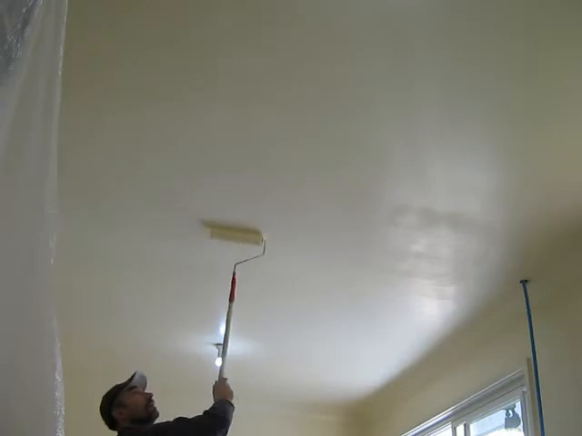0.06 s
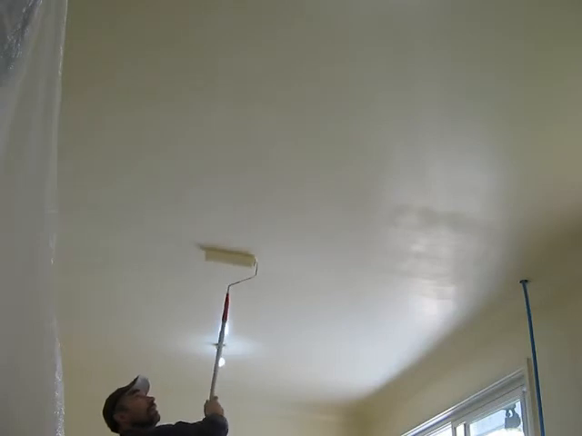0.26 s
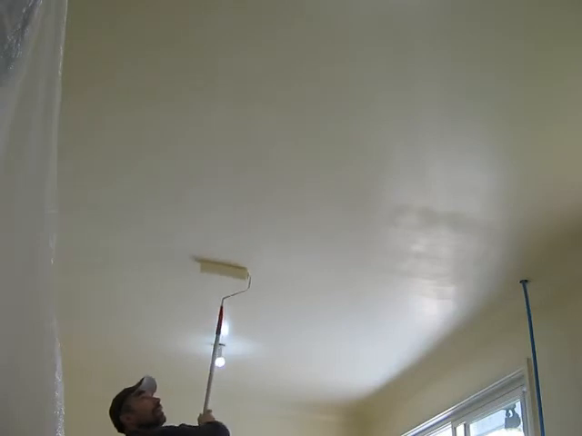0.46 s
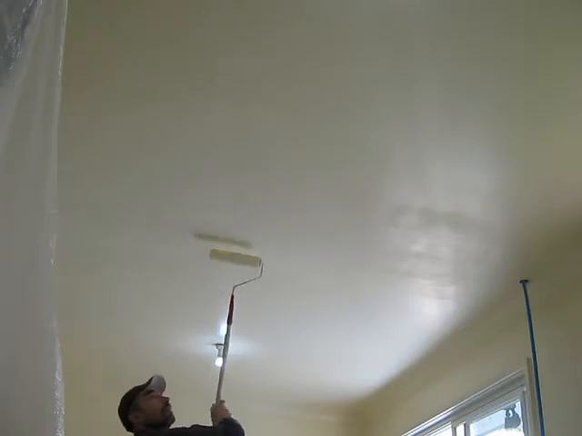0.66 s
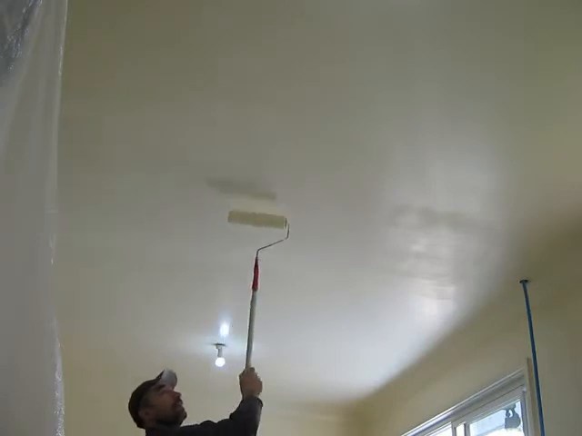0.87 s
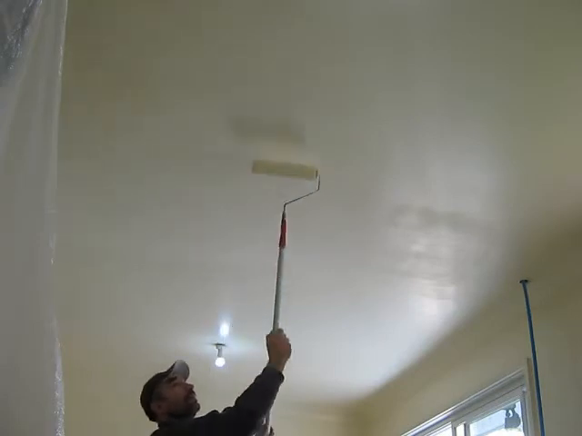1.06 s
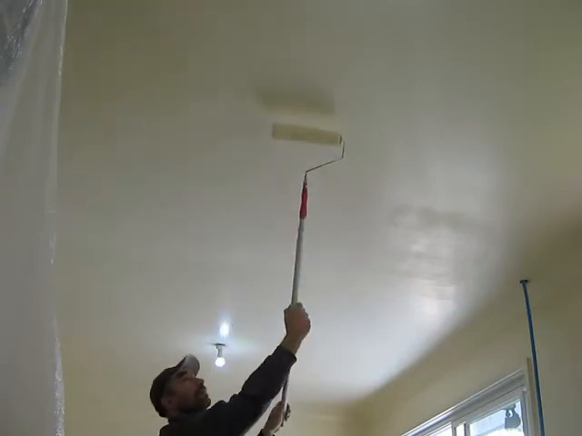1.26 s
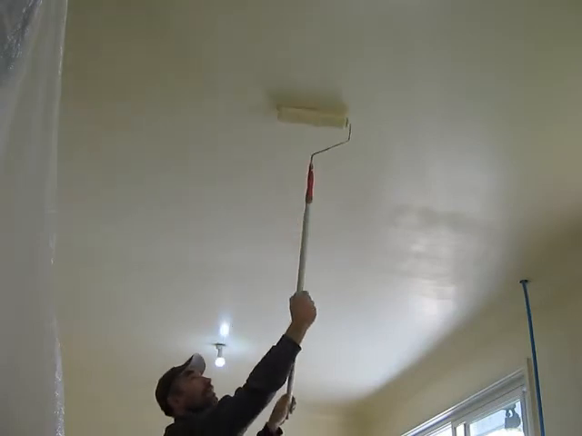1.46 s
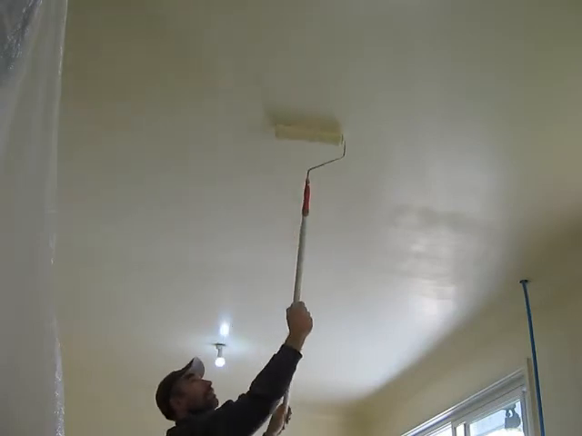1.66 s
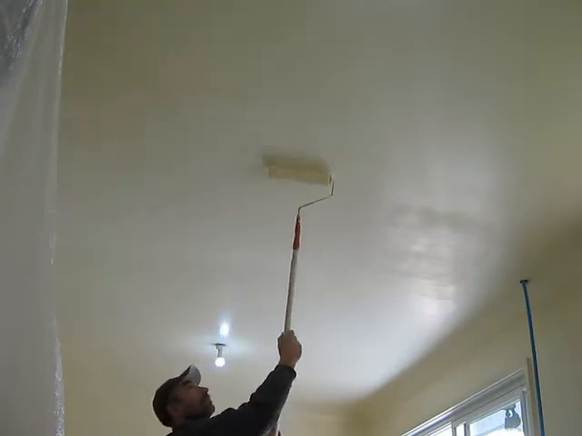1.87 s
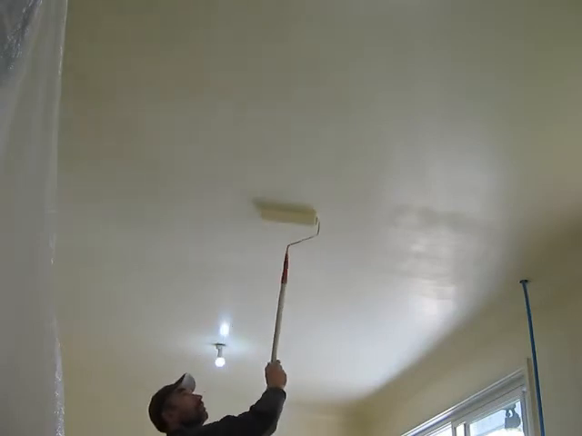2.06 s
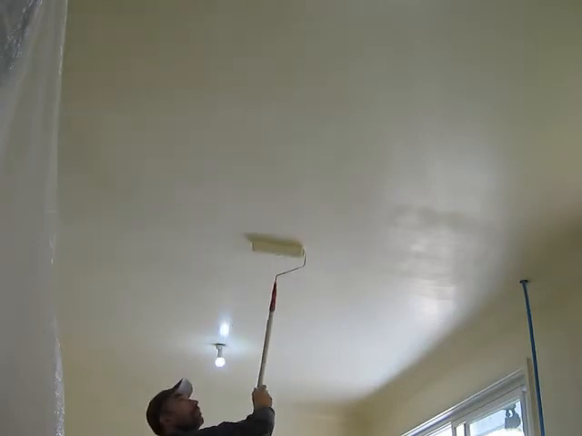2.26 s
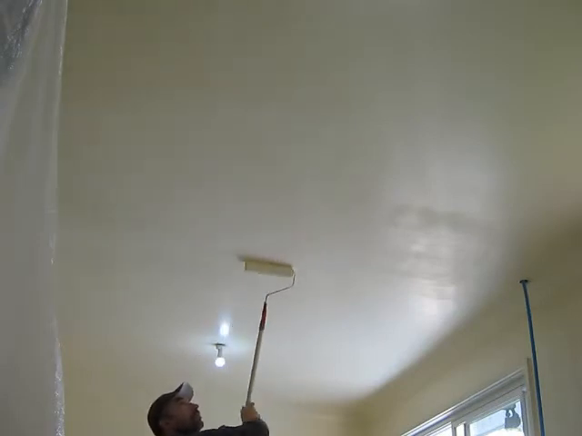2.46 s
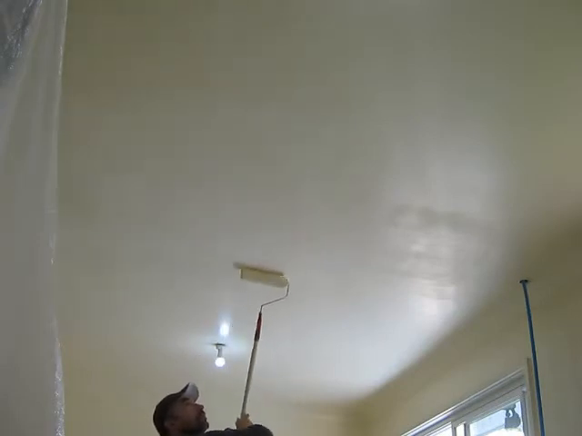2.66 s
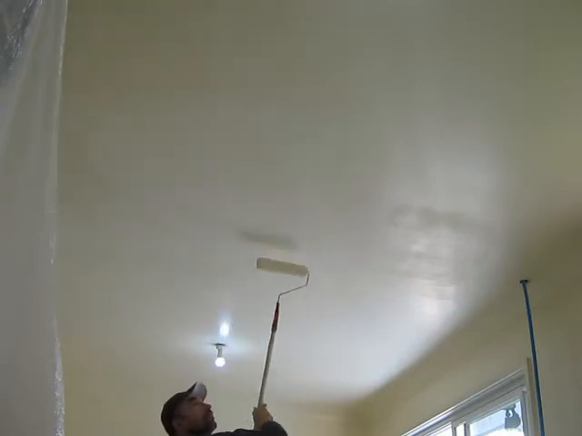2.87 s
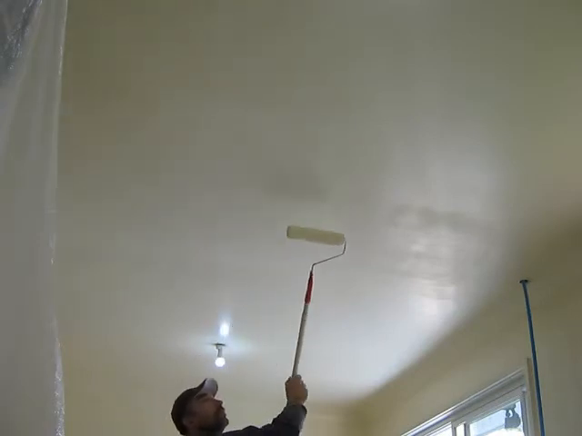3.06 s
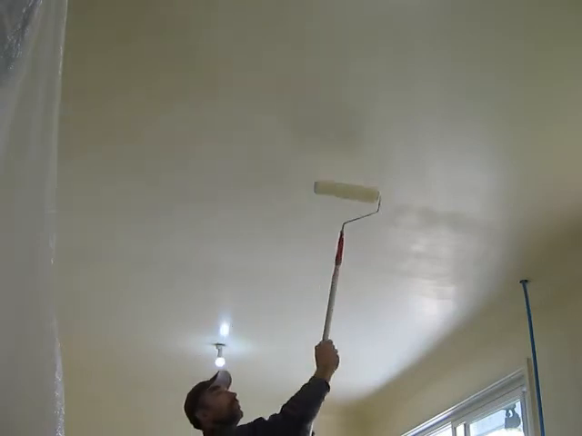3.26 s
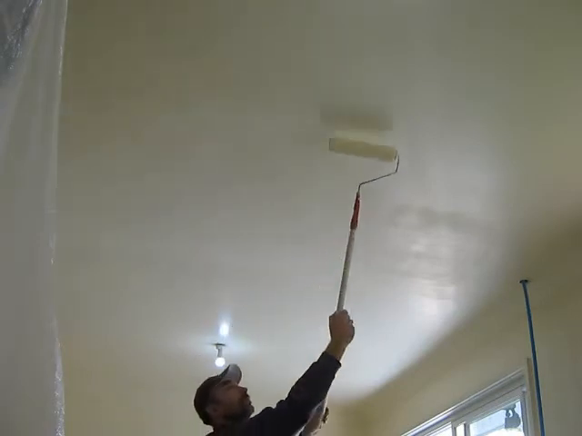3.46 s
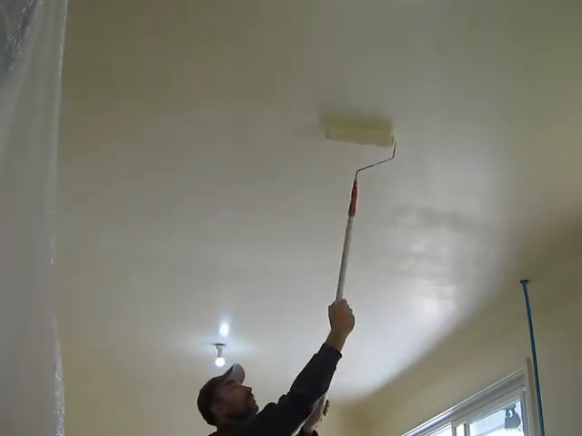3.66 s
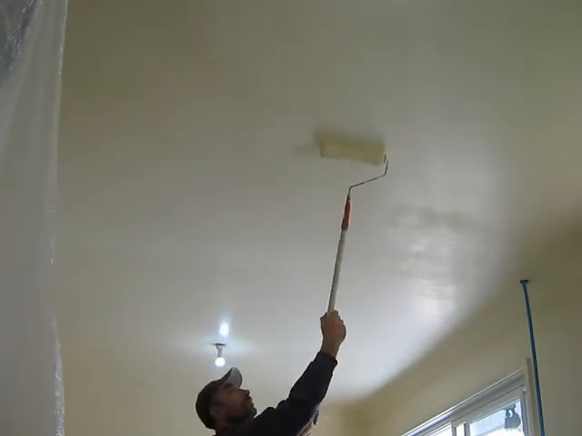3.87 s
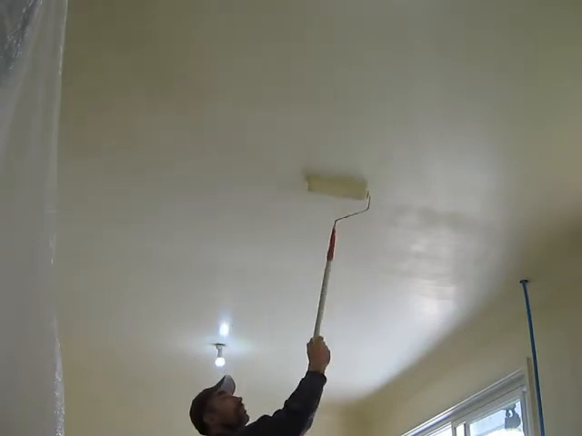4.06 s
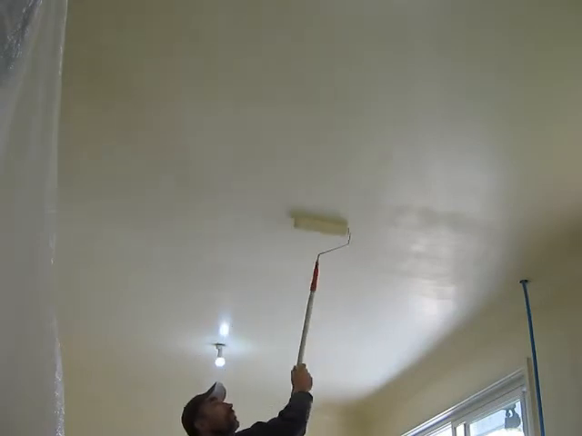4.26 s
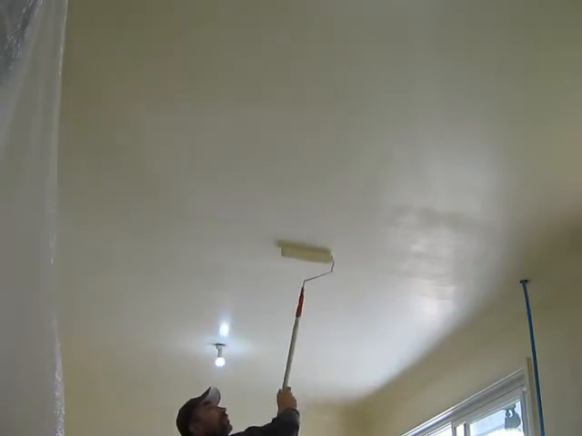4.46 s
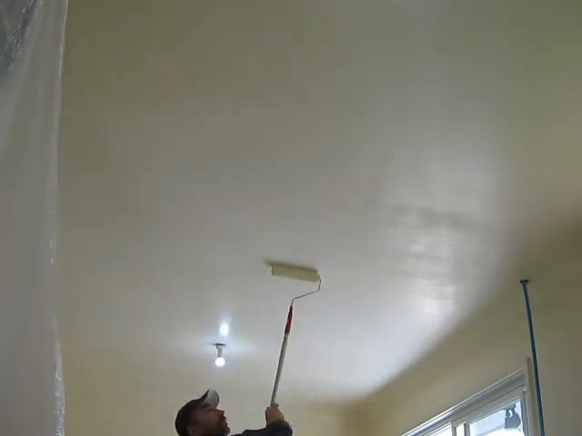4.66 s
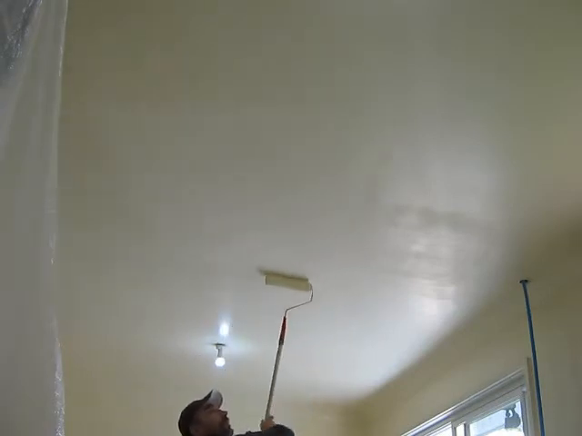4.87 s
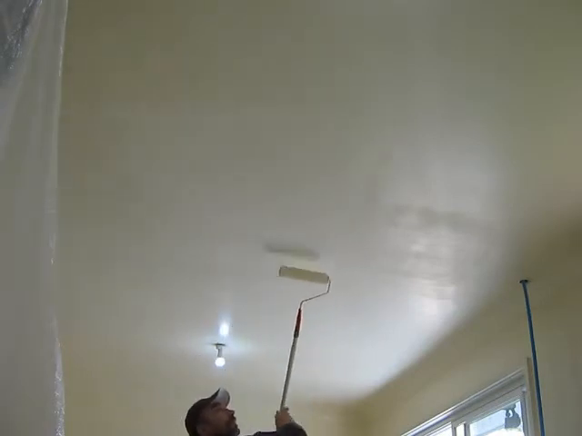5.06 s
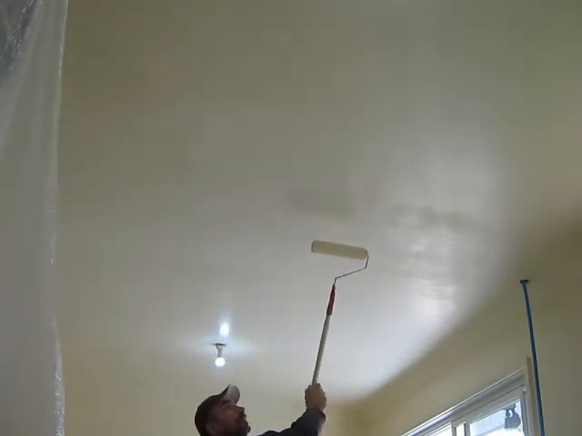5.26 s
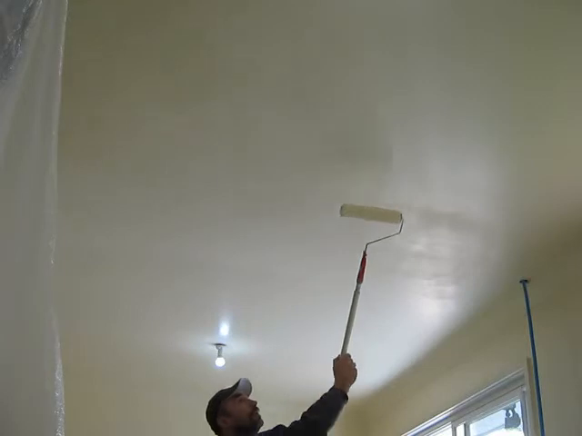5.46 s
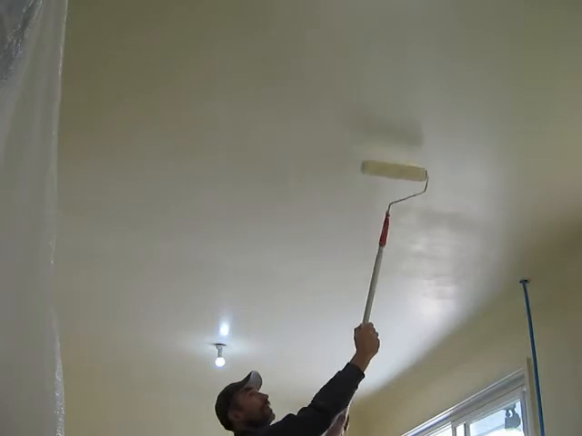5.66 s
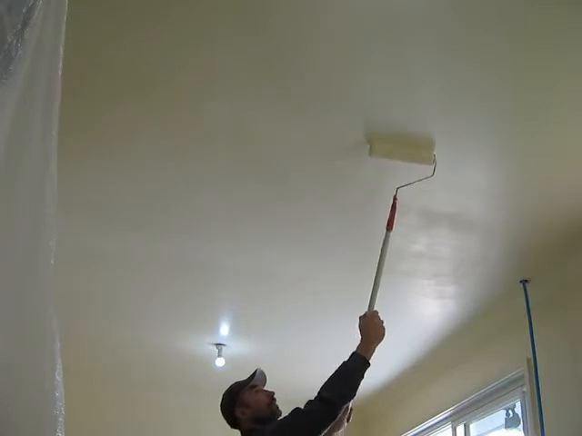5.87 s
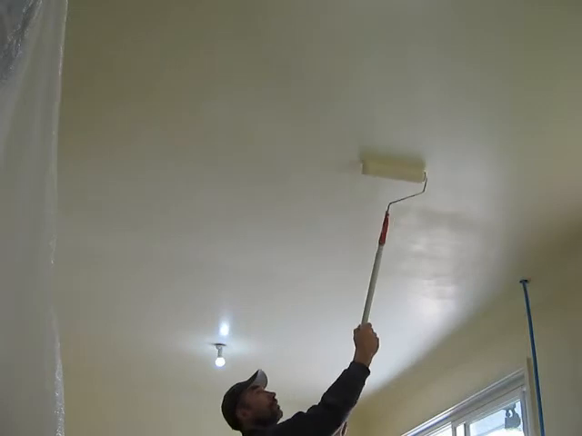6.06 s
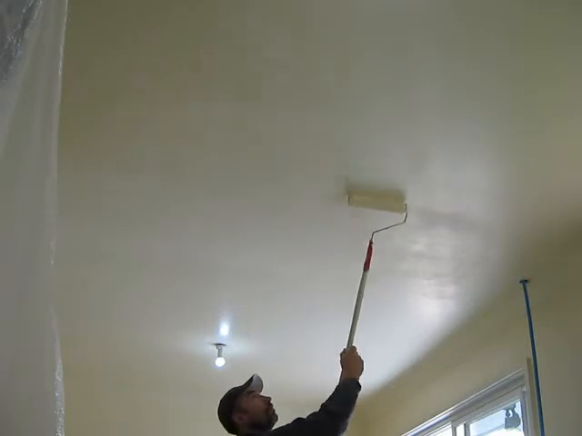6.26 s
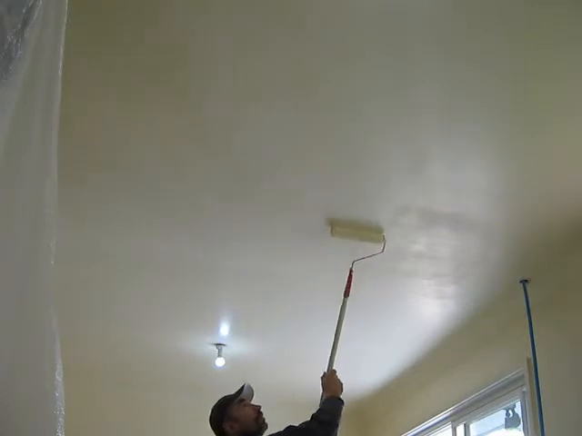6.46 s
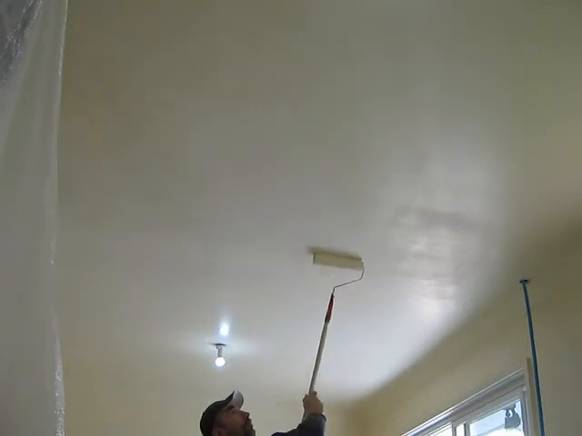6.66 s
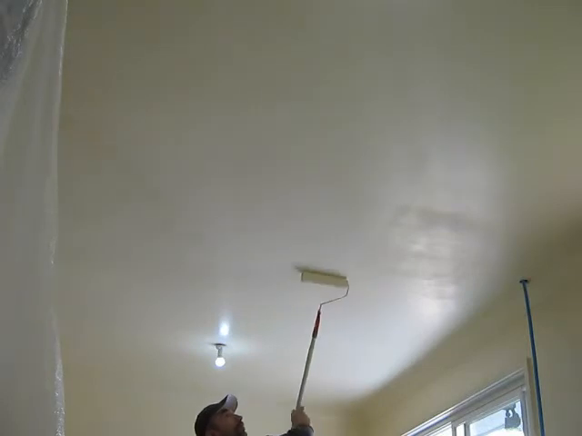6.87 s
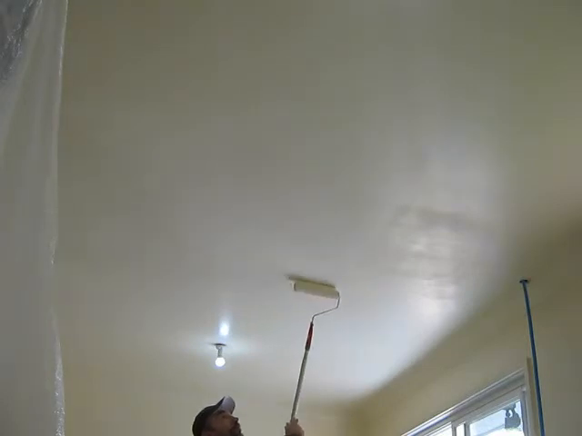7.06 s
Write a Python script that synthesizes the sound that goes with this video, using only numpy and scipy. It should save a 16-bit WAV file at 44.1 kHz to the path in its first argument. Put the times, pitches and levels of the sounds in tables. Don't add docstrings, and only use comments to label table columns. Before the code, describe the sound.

A wet paint roller on a pole strokes a ceiling in a bare room. The sound opens mid-hiss, goes quiet, then three more sticky, second-long hisses follow, pulsing as the roller turns, over a low board rumble. Soft thuds, ticks and a faint hum fill the gaps. A small, gritty low-quality camera microphone hears it with light room echo.

```python
import sys
import numpy as np
from scipy import signal
from scipy.fft import rfft, irfft
from scipy.io import wavfile
from scipy.ndimage import uniform_filter1d

SR = 44100
rng = np.random.default_rng(int(sys.argv[2]) if len(sys.argv) > 2 else 0)


def bounce(signal):
    frames = np.transpose(np.atleast_2d(signal))
    limited = np.clip(frames, -1, 1)
    pcm = np.round(limited * 32767).astype(np.int16)
    wavfile.write(sys.argv[1], SR, pcm)


def volts_from_db(level):
    exponent = np.asarray(level, float) / 20
    return 10 ** exponent


N = 313551
T = np.arange(N) / SR

# frequency in Hz, level in dB per Hz.
PAINT_COLOUR = [(180, -32.5), (300, -6.5), (442, -14), (517, -11), (1150, -13), (2910, -3), (4560, -0.5),
                (5400, 2.5), (7020, -32), (11900, -120)]
# frequency in Hz, level in dB, time to fade by 60 dB in seconds.
BOARD_MODES = [(31.66, -5.5, 0.23), (53.06, -2.5, .3), (91.1, -2, .2), (118.7, -4.5, 0.24),
               (149.7, -5.5, .12), (178.1, -5, 0.13), (217.1, -3, 0.11), (261.4, -7, 0.081),
               (337.8, -11, 0.069), (420, -15.5, 0.05)]
# start in seconds, board level in dB, strongest frequency in Hz, length in ms, wet smack level in dB.
THUD_EVENTS = [(.648, -52.5, 233, 170, -49), (.79, -50.5, 192, 85, -56.5), (1.446, -50.5, 52, 70, -51.5),
               (1.478, -42.5, 98, 79, -62), (2.898, -45.5, 185, 73, -57.5), (2.935, -45.5, 219, 90, -48.5),
               (2.92, -51.5, 68.4, 50, -61), (3.641, -50.5, 57.9, 110, -53), (5.151, -54.5, 305, 54, -60),
               (5.162, -56.5, 67.4, 32, -65), (5.801, -33, 163.4, 60, -44), (5.824, -37, 122.7, 36, -49.5),
               (5.867, -35.5, 115, 48, -47.5), (5.919, -44.5, 68, 91, -52), (7.103, -29, 381, 10, -61)]
# start in seconds, level in dB, centre frequency in Hz, length in ms, extra level in the room in dB.
SNAP_EVENTS = [(.655, -58, 390, 58, 1.5), (0.9284, -38, 3130, 16, 3.5), (0.930, -36, 2110, 17, 3.5),
               (.932, -41.5, 895, 17, 1.5), (1.555, -40, 3900, 1.9, -2.5), (1.793, -16.5, 4320, 0.7, 0),
               (2.324, -28, 3420, 4.6, -3), (2.911, -53.5, 380, 70, -3), (3.76, -41, 4300, 1.2, 1),
               (5.155, -54, 420, 54, 3.5), (5.815, -52, 886, 99, 0.5), (5.976, -47, 4260, 1.2, -1),
               (6.011, -51, 4450, 1.7, -12.5), (7.104, -34.5, 483, 14, 0), (7.107, -36, 3030, 16, 0)]
# frequency in Hz, level in dB per Hz.
AIR_COLOUR = [(15, -2), (35, -5), (70, -2), (150, 1), (300, 3.5), (600, -1.5), (1200, -4), (2500, -7),
              (5500, -11)]
# touch in seconds, lift in seconds, paint level in dB,
# sag over the stroke in dB, first grip relative to full level in dB.
ROLLER_STROKES = [
    (-.6, 0.414, -31, -3, -9),
    (1.569, 2.575, -31.5, -2.5, -11),
    (3.76, 4.792, -30.5, -6, -9.5),
    (6.006, 6.972, -33, -3, -8),
]
# time in seconds, surge in dB, level change of the dry patch just before in dB.
ROLLER_TURNS = [(0.096, -1, 0), (.234, 3.5, -1), (0.404, 3, 0.5), (1.609, 3.5, 0.5), (1.715, 2.5, 0),
                (1.856, 3, -3.5), (1.977, 2, -3), (2.094, 4, -1), (2.212, 0.5, -5), (2.325, 0, -0.5),
                (2.509, 2, 1), (3.842, 2, -3), (3.899, -0.5, -0.5), (3.983, 2.5, -3.5), (4.059, 1, 0.5),
                (4.235, 2.5, -2.5), (4.354, 3, 1), (4.56, 1.5, -0.5), (4.882, 10.5, -4.5), (6.12, 1, -1.5),
                (6.266, 4.5, 1.5), (6.403, 4, 1.5), (6.46, -0.5, -3.5), (6.536, 3, 1.5), (6.648, 3.5, 0),
                (6.779, 0.5, 2.5)]
# time in seconds, length in seconds, bass boost in dB, drone boost in dB.
POLE_LEANS = [(.1, 0.083, 5.5, 6.5), (.25, 0.083, 4.5, 4.5), (1.72, 0.055, 4, 5), (1.87, 0.07, 7, 6.5),
              (2.06, .08, 15, 11.5), (2.39, 0.2, 6.5, 5.5), (4.0, 0.053, 1.5, 3.5), (4.188, 0.079, 12, 10),
              (4.31, 0.037, 6.5, 2.5), (4.53, .08, 6.5, 4.5), (6.32, 0.082, 7, 10.5), (6.44, 0.11, 11, 4.5),
              (6.688, 0.15, 8, 8.5), (6.92, .06, 10, 6)]

GRIP_S, SPEED_UP_S = 0.022, 0.14
SLOW_DOWN_S, SLOW_DB, LIFT_DB_PER_S = 0.1, -3, -300
DRIP_DB, DRIP_DB_PER_S = -15, -83
SURGE_RISE_S, SURGE_FALL_S, DRY_LEAD_S, DRY_S = 0.01, 0.025, 0.028, 0.035
BASS_DB, DRONE_DB, LOAD_RISE_S = -50, -49.5, 0.071
BASS_FALL_DB_PER_S, DRONE_FALL_DB_PER_S = -40, -100
TONE_DB, DUCK_DB, DUCK_HOLD_S, DUCK_BACK_S = -52.5, -3, 0.25, 0.06
HUM_HZ, HUM_DB = 305, -75.5
HUM_SWELL_DB, HUM_SWELL_S, HUM_SWELL_LENGTH_S = 13.5, 2.3, 0.4
ROOM_T60_S, ROOM_TREBLE_T60_S, ROOM_DB = 0.5, 0.36, -6.5
STEP = 1 / 128 / np.sqrt(2)
OFFSET_STEPS = 0.27


def unit(x):
    return x / np.sqrt(np.mean(x ** 2))


def colour(x, points):
    hz, db = np.transpose(points)
    log_hz = np.log(np.linspace(1, SR / 2, 4097))
    cepstrum = irfft(np.interp(log_hz, np.log(hz), db) * np.log(10) / 20)
    cepstrum[1:4096] *= 2
    cepstrum[4097:] = 0
    return signal.fftconvolve(x, irfft(np.exp(rfft(cepstrum))))[:N]


def band(x, lo_hz, hi_hz):
    return signal.sosfilt(signal.butter(2, [lo_hz, hi_hz], "bandpass", fs=SR, output="sos"), x)


def walk(rate):
    hold = int(SR / rate)
    held = np.repeat(rng.standard_normal(N)[:N // hold + 1], hold)
    return unit(uniform_filter1d(uniform_filter1d(held, hold), hold)[:N])


def steady(x, span_s):
    power = uniform_filter1d(unit(x) ** 2, int(span_s * SR))
    return unit(x / np.sqrt(power + 0.11))


def ramp(start_s, length_s):
    return np.clip((T - start_s) / length_s, 0, 1)


def bump(s, rise_s, fall_s):
    return np.exp(-((T - s) / np.where(T < s, rise_s, fall_s)) ** 2)


def add(out, s, piece):
    start = int(s * SR)
    out[start:start + len(piece)] += piece[:N - start]


def rolling():
    gain = 0
    for on, off, db, sag_db, grip_db in ROLLER_STROKES:
        after = np.maximum(T - off, 0)
        lift = np.maximum(volts_from_db(LIFT_DB_PER_S * after), volts_from_db(DRIP_DB + DRIP_DB_PER_S * after))
        shape_db = grip_db * (1 - ramp(on, SPEED_UP_S))
        shape_db += sag_db * ramp(on, off - on)
        shape_db += SLOW_DB * ramp(off - SLOW_DOWN_S, SLOW_DOWN_S)
        gain = gain + ramp(on - GRIP_S, GRIP_S) * volts_from_db(db + shape_db) * lift
    turns_db = np.zeros(N)
    for s, surge_db, dry_db in ROLLER_TURNS:
        turns_db += surge_db * bump(s, SURGE_RISE_S, SURGE_FALL_S)
        turns_db += dry_db * bump(s - DRY_LEAD_S, DRY_S, 0.016)
    return gain * volts_from_db(turns_db)


def paint(per_s=4000, spread_db=2.5, most_db=15):
    happens, size, side = rng.random((3, N))
    sizes = volts_from_db(np.minimum(-spread_db * np.log(1 - size), most_db)) * np.sign(side - 0.5)
    threads = unit((happens < per_s / SR) * sizes)
    threads += volts_from_db(-6) * rng.standard_normal(N)
    patches_db = 0.25 * walk(24) + 0.7 * walk(70) - 0.5
    return unit(colour(threads, PAINT_COLOUR)) * rolling() * volts_from_db(patches_db)


def ring(force, tilt_db=0):
    t = T[:SR // 3, None]
    hz, db, t60 = np.transpose(BOARD_MODES)
    modes = np.sin(2 * np.pi * hz * t) * volts_from_db(db + tilt_db - 60 * t / t60) * (-1) ** np.arange(len(hz))
    return signal.fftconvolve(force, modes.sum(axis=1))[:len(force)]


def held(fall_db_per_s):
    gain = 0
    for on, off, *_ in ROLLER_STROKES:
        after = np.maximum(T - off + SLOW_DOWN_S, 0)
        gain = gain + ramp(on, LOAD_RISE_S) * volts_from_db(fall_db_per_s * after)
    return gain


def load():
    bass_db, drone_db = sum(np.outer(db, bump(s, length_s, length_s)) for s, length_s, *db in POLE_LEANS)
    bass_gain = held(BASS_FALL_DB_PER_S) * volts_from_db(BASS_DB + bass_db)
    drone_gain = held(DRONE_FALL_DB_PER_S) * volts_from_db(DRONE_DB + drone_db)
    return bass_gain, drone_gain


def rumble():
    shake = ring(rng.standard_normal(N))
    bass = steady(band(shake, 22, 75), 0.14)
    drone = steady(band(shake, 90, 500), 0.16)
    bass_gain, drone_gain = load()
    return bass * bass_gain + drone * drone_gain


def air():
    ducks = sum(bump(off + DUCK_HOLD_S, 0.12, DUCK_BACK_S) for _, off, *_ in ROLLER_STROKES)
    tone_db = TONE_DB + DUCK_DB * ducks + 0.26 * walk(24)
    tone = unit(colour(rng.standard_normal(N), AIR_COLOUR)) * volts_from_db(tone_db)
    hum_db = HUM_DB + HUM_SWELL_DB * bump(HUM_SWELL_S, HUM_SWELL_LENGTH_S, HUM_SWELL_LENGTH_S)
    hum_phase = 2 * np.pi * np.cumsum(HUM_HZ + 3.0 * walk(5)) / SR
    return tone + np.sin(hum_phase) * volts_from_db(hum_db + 3.4 * walk(6.2))


def tails(count):
    t = T[:SR // 2]
    low, high = rng.standard_normal((2, count, len(t)))
    answer = band(low, 100, 2600) * volts_from_db(-60 * t / ROOM_T60_S)
    answer += band(high, 2600, 9000) * volts_from_db(-60 * t / ROOM_TREBLE_T60_S)
    answer *= np.clip((t - 0.005) / 0.012, 0, 1)
    return answer / np.sqrt(np.sum(answer ** 2, axis=1, keepdims=True))


def room(x, size=2048):
    wet = np.zeros(N + SR)
    fade = signal.get_window("cosine", 2 * size)
    padded = np.pad(x, (size, 2 * size))
    answers = tails(count=24)
    for k, start in enumerate(range(0, N + size, size)):
        piece = signal.fftconvolve(padded[start:start + 2 * size] * fade, answers[k % len(answers)])
        wet[start:start + len(piece)] += piece
    return volts_from_db(ROOM_DB) * wet[size:size + N]


def thuds():
    out, age = np.zeros(N), T[:SR // 3]
    mode_hz = np.array(BOARD_MODES)[:, 0]
    noises = rng.standard_normal((len(THUD_EVENTS), 2, len(age)))
    for (s, db, hz, length_ms, smack_db), (push, smack) in zip(THUD_EVENTS, noises):
        contact = np.clip(age / 0.0024, 0, 1) * np.exp(-(age / (length_ms / 1000)) ** 2)
        blow = 0.78 * np.exp(-((age - 0.003) / 0.0012) ** 2)
        octaves_away = np.log2(mode_hz / hz)
        knock = ring(blow + contact * push, tilt_db=-11 * octaves_away ** 2)
        add(out, s, volts_from_db(db + 9) * knock / np.abs(knock).max())
        add(out, s, volts_from_db(smack_db) * contact * unit(band(smack, 900, 7000)))
    return out


def snaps():
    direct, far = np.zeros((2, N))
    noises = rng.standard_normal((len(SNAP_EVENTS), SR // 5))
    for (s, db, hz, length_ms, far_db), noise in zip(SNAP_EVENTS, noises):
        age = T[:len(noise)] / (length_ms / 1000)
        lo_hz, hi_hz = hz / 1.8, hz * 1.9
        burst = unit(band(band(noise, lo_hz, hi_hz), lo_hz, hi_hz))
        burst = burst * np.clip(age / 0.11, 0, 1) * np.exp(-age ** 3)
        add(direct, s, volts_from_db(db) * burst)
        add(far, s, volts_from_db(db + far_db) * burst)
    return direct, far


def scene():
    hiss = paint()
    direct, far = snaps()
    mono = hiss + direct + room(hiss + far) + thuds() + rumble() + air()
    return np.array([mono, mono])


def low_pass(x):
    return signal.sosfilt(signal.butter(12, 7235, fs=SR, output="sos"), x)


def record(dry):
    guard = signal.ellip(8, 0.1, 70, SR / 7.92, fs=SR, output="sos")
    limited = signal.sosfiltfilt(guard, dry)
    coarse = np.zeros_like(dry)
    coarse[:, 1::4] = STEP * np.round(limited[:, 1::4] / STEP + OFFSET_STEPS)
    smooth = 4 * signal.firwin(65, 0.99 * SR / 8, window=("kaiser", 9), fs=SR)
    mix = signal.fftconvolve(coarse, smooth[None], "same")
    return low_pass(mix)


dry = scene()
out = record(dry)
bounce(out)
```